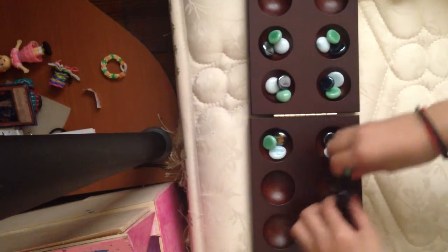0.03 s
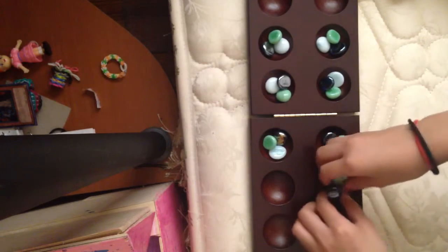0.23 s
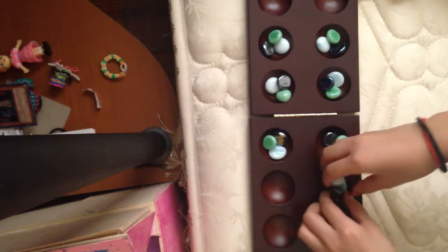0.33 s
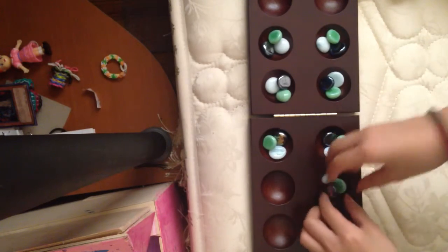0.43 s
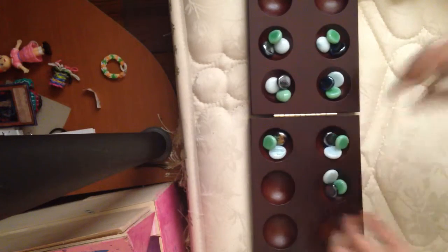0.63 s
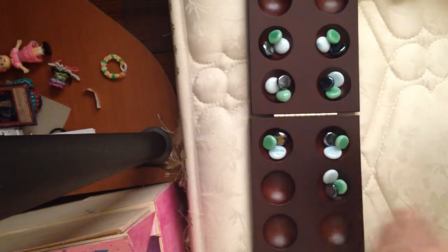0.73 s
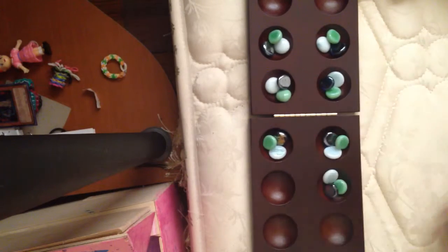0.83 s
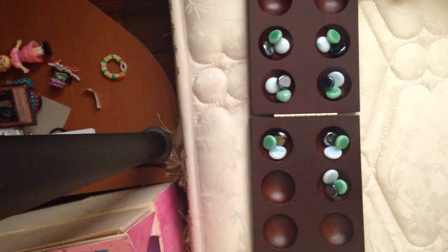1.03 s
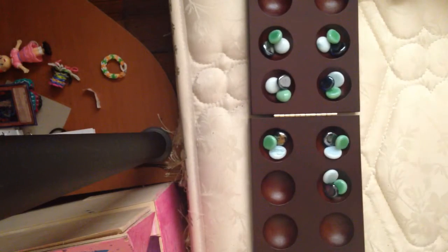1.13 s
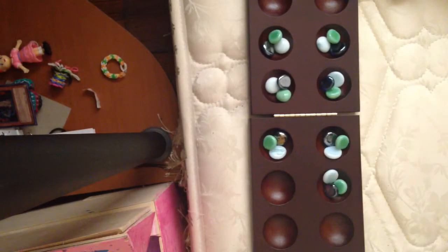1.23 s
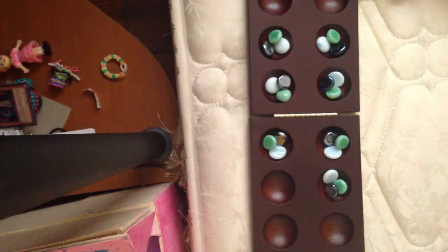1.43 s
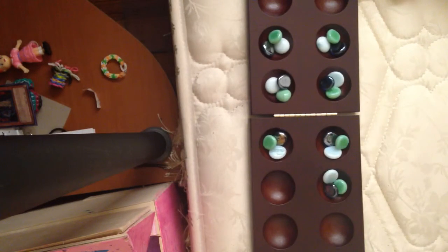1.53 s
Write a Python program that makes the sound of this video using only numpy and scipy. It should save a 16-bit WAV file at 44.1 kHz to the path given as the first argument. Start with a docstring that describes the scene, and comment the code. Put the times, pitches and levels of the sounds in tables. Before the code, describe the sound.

At about 0.25 seconds a handful of small glass stones drops into a pit of a wooden game board, with sharp knocks on the wood and bright clicks against each other. The dense clatter weakens and stops just after 0.5 seconds. One stone settles with a few faint ticks between 0.6 and 0.7 seconds. Then the small room is quiet, with only a faint hum and hiss.

```python
"""A handful of small glass stones drops into a pit of a wooden game board lying on a mattress.
Each knock on the wood is a crack, a few ringing modes and a dense grain. The stones bounce, click
and jostle against each other; one settles late as the hand slides away over cloth.
A small, soft room answers briefly over a faint hum and hiss."""
import sys
import numpy as np
from scipy import signal
from scipy.fft import rfft, irfft
from scipy.io import wavfile

SR = 44100
rng = np.random.default_rng(int(sys.argv[2]) if len(sys.argv) > 2 else 0)


def master(y):
    """Save y as 16-bit WAV."""
    cut = np.clip(np.atleast_2d(y).T, -1, 1)
    pcm = np.round(cut * 32767)  # scale
    wavfile.write(sys.argv[1], SR, pcm.astype(np.int16))


N = 70560
T = np.arange(8192) / SR  # time axis of one hit, seconds
HZ = np.fft.rfftfreq(8192, 1 / SR)

# Room tone, rumble up to hiss. Each row: frequency in Hz, relative level in dB.
ROOM_TONE = [(20, -43.5), (40, -24), (58, -5), (80, -4.5), (120, -6), (210, -12), (420, -17), (1100, -25),
             (3000, -28), (9500, -33), (13500, -31), (16000, -33.5)]
# Stone on wood. Each row: start in seconds, level in dB, brightness cutoff in Hz,
# low body boost in dB, resonance of the struck spot in Hz.
WOOD_KNOCKS = [(0.2209, -47, 3270, -7, 2181), (0.233, -45.5, 5000, -5, 2170),
               (0.2431, 1.5, 3800, -0.5, 2240), (0.2801, 1, 5200, 2.5, 2480), (0.3049, -1, 4840, 2, 2440),
               (.3113, -4, 3900, 3, 2420), (0.3229, -5.5, 5170, -8.5, 2570), (.332, -7.5, 4200, 0, 2420),
               (0.3382, -0.5, 3880, 2.5, 2325), (0.3404, -7, 3065, -5, 2397), (.354, -12, 3400, 4.5, 1670),
               (0.3638, -9, 3900, 5, 2320), (0.3722, -4.5, 6540, -4, 1680), (0.3855, -3, 3470, 4.5, 2500),
               (0.4042, -7, 3820, -3, 1820), (.4188, -5, 3070, -1, 2060), (0.4346, -10.5, 3500, 2, 1930),
               (.4444, -8.5, 3070, 0, 2100), (0.4648, -10, 2920, -7.5, 2220),
               (0.4797, -14.5, 2970, -7, 1850), (0.4937, -15, 3500, -5.5, 1840),
               (0.496, -12, 3420, -12, 2090), (0.5001, -11, 6350, 2, 2240), (0.5041, -15.5, 6360, -7, 2190),
               (0.6152, -23.5, 3580, -1.5, 2120), (0.6339, -33, 3040, 18, 1830),
               (0.6597, -34.5, 2200, 8, 1840), (0.6884, -36.5, 4500, -6, 2090)]
# The board's ringing modes. Each row: frequency in Hz, relative level in dB, T60 in seconds.
BOARD_MODES = [(378.8, -21, 0.013), (479, -21, .05), (830, -21, 0.032), (940, -12.5, .04),
               (1103, -10.5, 0.06), (1380, -13.5, 0.024), (1682, -11, 0.14), (1806.4, -10, 0.1),
               (2163, -7.5, 0.076), (2384, -5, .045), (2700, -10, .035), (2982, -10, 0.096),
               (3840, -15.5, .035), (4430, -16.5, .07)]
# Tone of a knock's crack and grain. Each row: frequency in Hz, relative level in dB.
CRACK_EQ = [(60, -34), (200, -25), (380, -9.5), (560, -7), (690, -11.5), (830, -3.5), (1450, -3),
            (1780, 2.5), (2010, -8.5), (2300, -1), (2800, 0.5), (3400, -4.5), (4000, -1), (4700, -6.5),
            (8000, -3.5), (15000, -10.5)]
# The room's decay. Each row: frequency in Hz, T60 in seconds.
ROOM_DECAY = [(150, .25), (1000, 0.19), (2500, 0.14), (5000, 0.18), (14000, 0.083)]
# Stone on stone. Each row: start in seconds, level in dB, pitch in Hz.
GLASS_CLICKS = [(0.247, -26, 8960), (0.2775, -18.5, 12870), (0.2841, -11, 12230), (0.2889, -15, 12010),
                (0.2952, -24, 11000), (0.3024, -1.5, 9360), (.3067, -1.5, 10770), (0.316, -15, 12510),
                (0.3267, -5.5, 11900), (0.3361, -7.5, 12500), (.337, -19.5, 13000), (.345, -7, 13930),
                (.356, -21.5, 11010), (0.36, -16.5, 12030), (0.367, -21, 12000), (0.3689, -15, 10310),
                (0.38, -16, 11140), (0.382, -16, 10500), (0.3966, -13, 11700), (.402, -24, 9500),
                (0.4021, -6.5, 10100), (0.4126, -13.5, 10520), (.4137, -40, 10000), (0.4377, -15.5, 9100),
                (.4582, -19.5, 9350), (.4721, -17, 10600), (0.4907, -28, 11220), (0.496, -17, 11100),
                (0.5015, -19, 8850), (0.5066, -25, 10150), (0.514, -31, 10400), (.5235, -41, 10100),
                (.6268, -34.5, 9300), (.6335, -35.5, 10540), (.687, -35, 9300)]
# Tone of a click's snap. Each row: frequency in Hz, relative level in dB.
SNAP_EQ = [(300, -31), (2000, -16.5), (4000, -14), (5000, -6), (6000, -3), (7300, -11.5), (9400, -2.5),
           (15000, -6.5)]
# Fader curve for the tiny contacts. Each row: time in seconds, level in dB.
JOSTLE_LEVELS = [(0.281, -40), (.31, -24), (.345, -27), (.41, -35.5), (.425, -39), (.49, -42), (.505, -31),
                 (0.524, -38)]
# Hand and sleeve on cloth. Each row: start in seconds, length in seconds, level in dB,
# centre in Hz, half-width in octaves.
CLOTH_BRUSHES = [(0.499, 0.41, -69, 10000, 1), (0.598, 0.2, -69, 6100, 0.31),
                 (1.178, 0.096, -77, 1410, 1.18), (1.35, 0.16, -76.5, 12000, 0.77)]


def amp(db):
    """Decibels to gain."""
    return 10 ** (np.asarray(db) / 20)


def unit(x):
    """Scales to energy one."""
    return x / np.sqrt(np.sum(x ** 2) + 1e-20)


def curve(points, hz):
    """Interpolates a table along log frequency."""
    f, value = np.transpose(points)
    return np.interp(np.log(hz + 1), np.log(f + 1), value)


def bell(centre_hz, gain_db, half_width_hz):
    """A resonant EQ bump, in dB."""
    return gain_db / (1 + ((HZ - centre_hz) / half_width_hz) ** 2)


def add(mix, start_s, sound):
    """Mixes a sound in at its start time."""
    part = mix[round(start_s * SR):][:len(sound)]
    part += sound[:len(part)]


def fade(t, t60):
    """Exponential decay, 60 dB down at t60."""
    return np.exp(-np.log(1000) * t / t60)


def tight_pulse(db):
    """The most compact pulse with this spectrum (minimum phase)."""
    log_gain = np.log(amp(np.r_[db, db[-2:0:-1]]))
    return np.fft.ifft(np.exp(np.conj(signal.hilbert(log_gain)))).real


def through(x, pulse):
    """Filters x by a pulse, keeping its length."""
    return signal.fftconvolve(x, pulse)[:len(x)]


def burst(t60, rise_s=1e-9):
    """Dense reflections of energy one that build up and die."""
    return unit(rng.standard_normal(len(T)) * fade(T, t60) * (1 - np.exp(-T / rise_s)))


def noise(eq_db):
    """Noise of rms one, coloured by a function of frequency."""
    spectrum = rfft(rng.standard_normal(N)) * amp(eq_db(np.fft.rfftfreq(N, 1 / SR)))
    return np.sqrt(N) * unit(irfft(spectrum, N))


def room_tone(hum_hz=60):
    """A faint bed of rumble, hiss and mains hum."""
    hum = np.sqrt(2) * np.sin(2 * np.pi * (hum_hz * np.arange(N) / SR + rng.random()))
    return amp(-69) * noise(lambda f: curve(ROOM_TONE, f)) + amp(-75) * hum


def knock(level_db, bright_hz, body_db, spot_hz):
    """Stone strikes wood: crack, modes and grain, coloured by the spot and the contact time."""
    hz, db, t60 = np.transpose(BOARD_MODES)[:, :, None]
    vary_db = 2 * rng.standard_normal(hz.shape)  # a fresh balance of modes on every hit
    modes = unit((amp(db + vary_db) * fade(T, t60) * np.cos(2 * np.pi * hz * T)).sum(0))
    crack = unit(tight_pulse(curve(CRACK_EQ, HZ)))
    grain = unit(through(burst(t60=0.025, rise_s=0.0006), crack))  # blooms just after the crack
    wood = amp(-0.5) * crack + amp(-7) * modes + amp(-0.5) * grain
    hard_edge = amp(-19) ** 2  # the treble that remains above the cutoff
    contact_db = 10 * np.log10(1 / (1 + (HZ / bright_hz) ** 10) + hard_edge)
    low_shelf_db = body_db / (1 + (HZ / 1200) ** 4)
    spot_db = low_shelf_db + bell(spot_hz, gain_db=7, half_width_hz=160)
    colour = rfft(tight_pulse(contact_db + spot_db))
    travel_s = 0.0003  # for bending waves at 2 kHz; higher ones arrive sooner
    dispersion = np.exp(-4j * np.pi * travel_s * np.sqrt(2000 * HZ))
    pulse = np.roll(irfft(colour * dispersion), 4)[:1024]
    return amp(level_db) * unit(through(wood, pulse))


def room_reverb(x, level_db, predelay_s=0.004):
    """A short diffuse tail, each band dying at its own speed."""
    hz, t, bands = signal.stft(rng.standard_normal(SR // 2), SR, nperseg=256)
    tail = signal.istft(bands * fade(t, curve(ROOM_DECAY, hz)[:, None]), SR)[1]
    return amp(level_db) * through(x, np.r_[np.zeros(round(predelay_s * SR)), unit(tail)])


def click(level_db, pitch_hz):
    """Two stones meet: a bright snap that rattles around the pit for a few milliseconds."""
    snap = tight_pulse(curve(SNAP_EQ, HZ) + bell(pitch_hz, gain_db=7, half_width_hz=400))
    pit = amp(-0.5) * burst(t60=0.0035) + amp(-3) * burst(t60=0.012)
    return amp(level_db) * unit(snap + through(pit, snap))


def jostle(per_second=300, low_hz=4000, high_hz=10900):
    """Many tiny contacts between the rolling stones, each a brief ping of its own pitch."""
    times, level_db = np.transpose(JOSTLE_LEVELS)
    span_s = times[-1] - times[0]
    out, t = np.zeros(N), T[:1024]
    for when, pitch in rng.random((round(per_second * span_s), 2)):
        start = times[0] + when * span_s
        hz = low_hz * (high_hz / low_hz) ** pitch
        ping = unit(np.sin(2 * np.pi * hz * t) * fade(t, t60=0.0035))
        add(out, start, amp(np.interp(start, times, level_db)) * ping)
    return out


def brush(length_s, level_db, centre_hz, octaves):
    """Hand and sleeve slide over cloth: a soft hiss that swells and fades."""
    hiss = noise(lambda f: -10 * np.log10(1 + (np.log2((f + 1) / centre_hz) / octaves) ** 4))
    count = round(length_s * SR)
    return amp(level_db) * hiss[:count] * np.sin(np.linspace(0, np.pi, count))


def scene():
    """The mono mix: knocks and clicks feed the reverb; jostle, cloth and room tone stay dry."""
    knocks, clicks, bed = np.zeros(N), np.zeros(N), room_tone()
    for start, *row in WOOD_KNOCKS:
        add(knocks, start, knock(*row))
    for start, *row in GLASS_CLICKS:
        add(clicks, start, click(*row))
    for start, *row in CLOTH_BRUSHES:
        add(bed, start, brush(*row))
    reverb = room_reverb(knocks, level_db=-11.5) + room_reverb(clicks, level_db=-10.5)
    return (knocks + clicks + reverb + bed + jostle())[None]


def record(dry):
    """A steep high cut at 15.5 kHz takes off the very top."""
    high_cut = signal.firwin(255, 15500, window=("kaiser", 8), fs=SR)
    return signal.oaconvolve(dry, high_cut[None], "same")


dry = scene()
out = record(dry)
master(out)
```